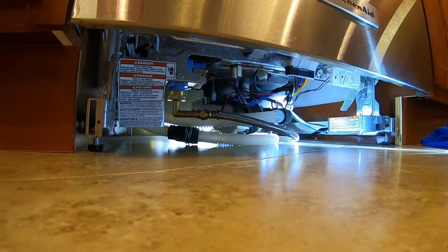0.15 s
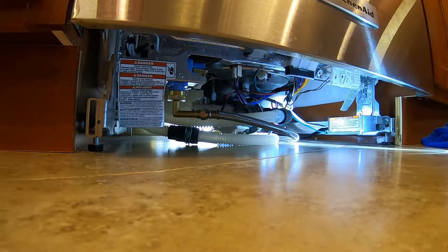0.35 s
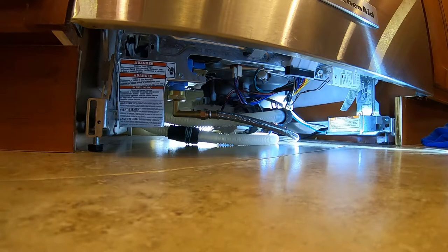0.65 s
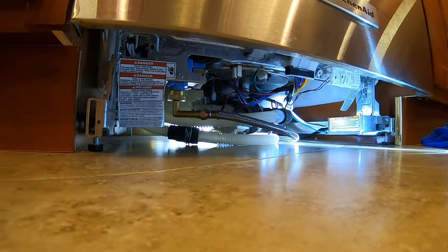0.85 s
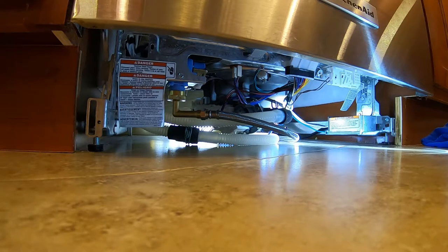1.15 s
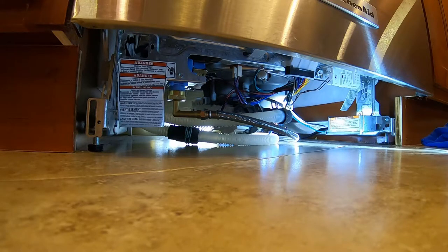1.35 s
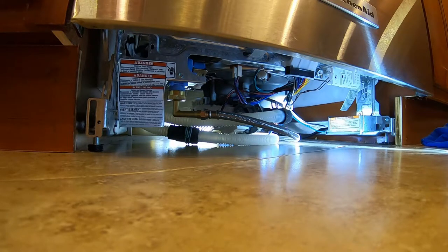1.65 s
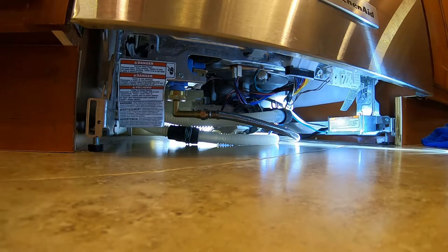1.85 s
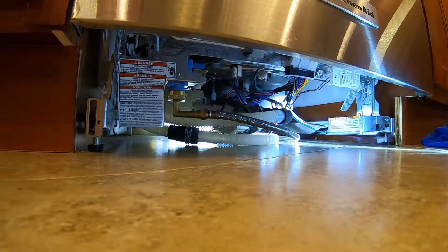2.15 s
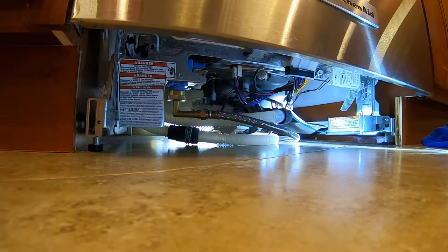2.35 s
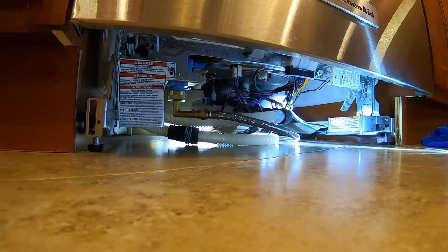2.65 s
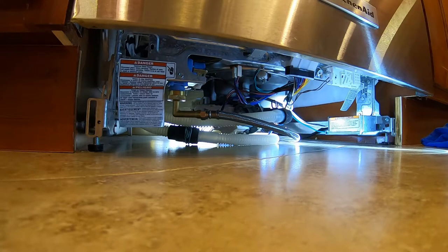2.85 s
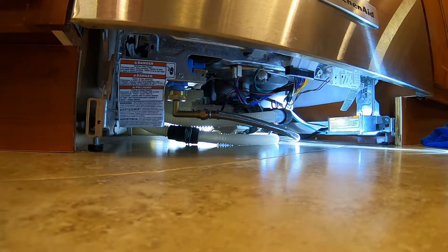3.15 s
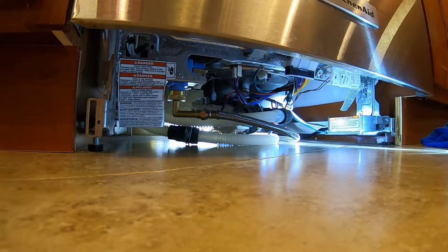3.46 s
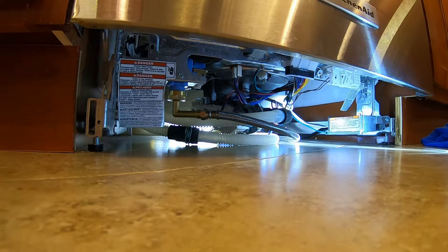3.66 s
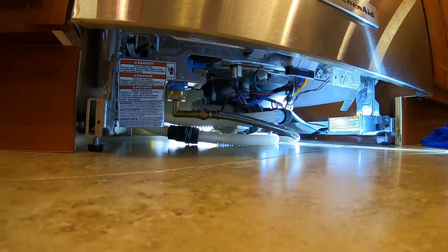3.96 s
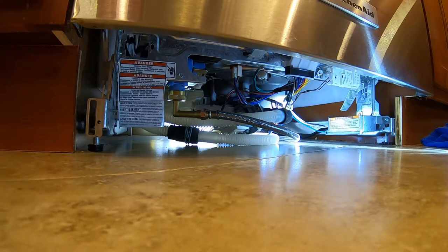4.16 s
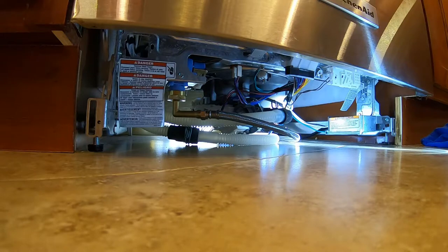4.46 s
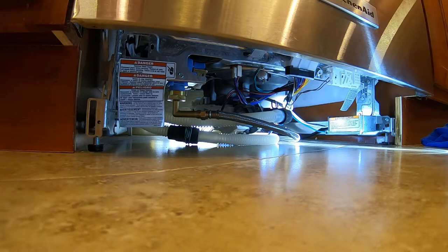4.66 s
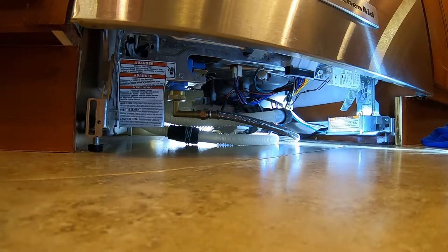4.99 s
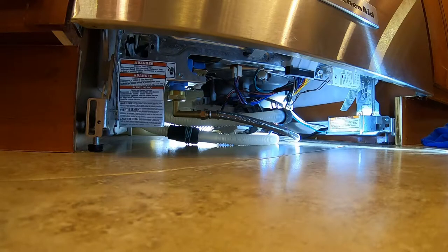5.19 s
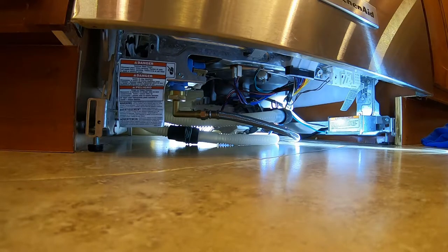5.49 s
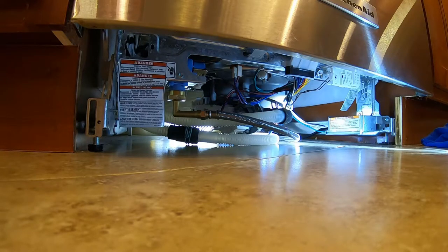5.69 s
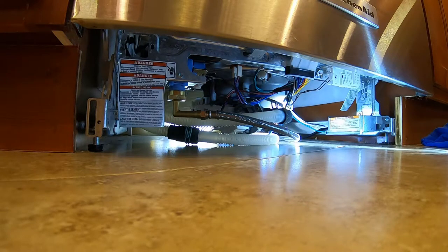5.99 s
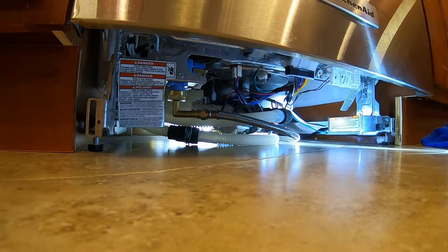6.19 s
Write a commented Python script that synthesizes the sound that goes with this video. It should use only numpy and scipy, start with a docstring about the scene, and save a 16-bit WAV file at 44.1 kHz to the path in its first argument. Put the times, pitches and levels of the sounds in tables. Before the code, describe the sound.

A stereo pair on a kitchen floor, just before a dishwasher's open base, hears steady deep motor hum, grainy buzzing and faint whine above low rumble. Spray washes continuously, with soft burbles and scattered droplets. The sharp water-inlet hiss stops in two quick steps within the first two seconds, ending in a thud; later, wet gulping slurps thicken, ease, then briefly return.

```python
"""A steady low hum with a coarse buzz, water rushing and gurgling, and a hiss that shuts in two steps.
It is a dishwasher pump, heard by a stereo pair on the kitchen floor just in front of the open kick panel.
The motor hums at twice the mains rate, whines on mains overtones, and buzzes and knocks each mains cycle.
Shaped noise makes the low shake and rumble, the rush of water, and its drops, burbles and slurps.
The fill valve is a jet of bright noise, part of it ringing in its pipe; it shuts with a thump."""
import sys
import numpy as np
from scipy import signal
from scipy.fft import rfft, irfft
from scipy.io import wavfile

SR = 44100
rng = np.random.default_rng(int(sys.argv[2]) if len(sys.argv) > 2 else 0)


def wav_out(sig):
    """Save sig, one row per channel (or a flat mono array), as 16-bit PCM at SR to the path in sys.argv[1]."""
    wavfile.write(sys.argv[1], SR, np.round(np.clip(np.atleast_2d(sig).T, -1, 1) * 32767).astype(np.int16))


N = 279132   # length in samples
HUM_HZ = 119.94   # twice the mains rate


def amp(db):
    """Turn decibels into gain."""
    return 10 ** (np.asarray(db) / 20)


def rms_one(x):
    """Scale to rms 1, all channels together."""
    return x / np.sqrt(np.mean(x ** 2) + 1e-20)


def in_time(rows):
    """Read each column of a time curve, one value a sample."""
    start_s, *columns = np.transpose(rows)
    return [np.interp(np.arange(N) / SR, start_s, column) for column in columns]


def at_hz(points, hz):
    """Read a spectrum on a log-frequency axis."""
    pitch_hz, level_db = np.array(points).T
    return np.interp(np.log(hz), np.log(pitch_hz), level_db)


def drift(rate):
    """Slow random wander of rms 1: noise through two equal low-passes at rate (Hz)."""
    every = 40   # samples between computed points
    pole = np.exp(-2 * np.pi * rate * every / SR)
    noise = rng.standard_normal(N // every + 2002)
    slow = signal.lfilter([1], [1, -2 * pole, pole ** 2], noise)[2000:]   # drop the filter's start
    return np.interp(np.arange(N) / every, np.arange(len(slow)), rms_one(slow))


# stereo width on the floor: pitch_hz, side_minus_mid_db
WIDTH = [(60, -54), (100, -82), (210, -53), (330, -17), (500, -15), (800, -6), (1050, -5.5), (1500, -7),
         (2200, -7), (3600, -12), (4500, -7.5), (5100, -3.5), (5800, -4.5), (6500, -2.5), (14000, 0.5)]
# lean of the motor and water across the pair: pitch_hz, left_minus_right_db
LEAN = [(400, 0), (700, 0), (1050, -3), (1550, -1), (2200, -2.8), (3800, -.6), (5200, -2.3), (5900, .5),
        (6600, -3.6), (7800, -3), (9200, 1.8), (11100, -5.5), (12500, -2.7), (14200, 0)]


def stereo(mid, side, lean, direct=0.44):
    """Spread two sources into a left-right pair; returns its spectrum and the bins in Hz.

    The direct share of the width is the same sound reaching the left port first, a quarter cycle ahead of mid."""
    hz = np.maximum(np.arange(N // 2 + 1) * SR / N, 1)
    wide = amp(at_hz(WIDTH, hz))
    direct = np.clip(direct, 0, 1)
    apart = direct * 1j * rfft(mid) + np.sqrt(1 - direct ** 2) * rfft(side)
    left_right = np.array([[1], [-1]])
    pair = (rfft(mid) + wide * apart * left_right) / np.sqrt(1 + wide ** 2)
    return pair * amp(at_hz(lean, hz) / 2 * left_right), hz


def patchy_noise(spectrum, lean, shared_db, own_db, rate):
    """Coloured noise of rms 1 in half-octave bands that swell together and flicker alone."""
    bins, hz = stereo(*rng.standard_normal((2, N)), lean)
    lowest_hz, highest_hz = spectrum[0][0], spectrum[-1][0]
    bins = bins * amp(at_hz(spectrum, hz)) * (hz > lowest_hz)
    half_octaves = 2 * np.log2(hz)
    together = drift(rate)
    out = 0
    for k in range(int(2 * np.log2(lowest_hz)), int(2 * np.log2(highest_hz)) + 2):
        band = np.cos(np.pi / 2 * np.clip(half_octaves - k, -1, 1)) ** 2
        swell_db = shared_db * together + own_db * drift(rate)
        out = out + amp(swell_db) * irfft(bins * band, N)
    return rms_one(out)


def resonate(x, modes):
    """Drive two-pole resonances in parallel, signs alternating; modes are pitch_hz, width_hz, level_db."""
    out = 0
    for k, (hz, width, level_db) in enumerate(modes):
        r = np.exp(-np.pi * width / SR)
        feed = (1 - r * r) / 2 * np.array([1, 0, -1])
        poles = [1, -2 * r * np.cos(2 * np.pi * hz / SR), r * r]
        out = out + (-1) ** k * amp(level_db) * signal.lfilter(feed, poles, x)
    return out


def splashes(rows, t60, modes_of):
    """A snap and a dying burst of noise ring each row's own resonances; rows are start_s, level_db, colour."""
    length = 4096
    t = np.arange(length) / SR
    out = np.zeros((2, N + length))
    for start_s, level_db, *colour in rows:
        burst = amp(-60 * t / max(t60, .003)) * rng.standard_normal((2, length))
        burst[:, 0] = 5.8   # the snap
        start = round(start_s * SR)
        for mode in modes_of(*colour):
            rung = resonate(resonate(burst, [mode]), [mode])   # twice, for steeper skirts
            rung = rung / np.abs(rung).max(axis=1, keepdims=True)
            out[:, start:start + length] += amp(level_db + mode[2]) * rung
    return irfft(stereo(*out[:, :N], LEAN)[0], N)


# motor hum: start_s, level_db (rms)
HUM = [(0, -20.5), (0.9, -21), (1.05, -22.5), (1.2, -21.5), (2.3, -21.3), (2.94, -22.7), (3.1, -22),
       (4.2, -22.5), (4.38, -24), (4.55, -23), (5.39, -25.5), (5.43, -24), (6.33, -23)]


def hum():
    """Magnetic pull at twice the mains rate, nearly a pure tone with a slight wander of phase."""
    turn = 2 * np.pi * HUM_HZ * np.arange(N) / SR + 0.034 * drift(0.34)
    level_db, = in_time(HUM)
    return np.sqrt(2) * amp(level_db) * np.cos(turn + np.pi)


# overtones of the mains in the motor: multiple_of_mains, level_db (rms before swelling)
WHINE = [(16, -68), (18, -65), (25, -66), (27, -70), (29, -68), (30, -68), (47, -69)]


def whine():
    """Thin tones at multiples of the mains rate, steady in pitch, each swelling on its own."""
    t = np.arange(N) / SR
    out = 0
    for multiple, level_db in WHINE:
        tone = np.sin(np.pi * HUM_HZ * multiple * t + rng.uniform(0, 2 * np.pi))
        out = out + amp(level_db + 2.9 * drift(2.8)) * tone
    return np.sqrt(2) * out


# resonances of the motor housing: pitch_hz, width_hz, level_db
HOUSING = [(1044, 25, -8), (1500, 130, -10.5), (1745, 144, -3.5), (2860, 130, -12), (3770, 130, -15.5),
           (4436, 155, -8), (5500, 49, -9.5), (5754, 67, -6), (9630, 230, -22), (10150, 110, -24),
           (10150, 200, -16.5), (10950, 90, -43)]
# buzz strength within one mains cycle: place_cycles, width_cycles, level_db
BUZZ_BEATS = [(.05, 0.057, -3.5), (.33, 0.031, -5), (.75, 0.19, 1.5)]


def buzz():
    """The rotor shakes the housing in uneven bursts, the same pattern every mains cycle."""
    cycle = HUM_HZ / 2 * np.arange(N) / SR + 0.21
    gate = 0.045   # strength between bursts
    for place, width, level_db in BUZZ_BEATS:
        away = (cycle - place + .5) % 1 - .5
        gate = gate + amp(level_db) * np.exp(-.5 * (away / width) ** 2)
    shaking = gate * amp(0.19 * drift(2.7)) * rng.standard_normal((2, N))
    pair, _ = stereo(*resonate(shaking, HOUSING), LEAN)
    return amp(-50.5) * rms_one(irfft(pair, N))


# resonances struck by the rotor: pitch_hz, width_hz, level_db
KNOCK_MODES = [(1090, 86, -10), (1470, 290, 0), (1764, 74, 7), (2930, 280, -13), (4330, 180, -17),
               (5560, 490, -10)]


def knock():
    """The rotor knocks once a mains cycle, a little unevenly in time and strength."""
    cycles = np.arange(int(N / SR * HUM_HZ / 2) - 1)
    late, strength = rng.standard_normal((len(cycles), 2)).T
    start_s = (cycles + .77) * 2 / HUM_HZ + .00006 * late
    clicks = np.zeros((2, N))
    clicks[0, np.clip(start_s * SR, 0, N - 1).astype(int)] = amp(2.7 * strength)
    struck = resonate(clicks + 1e-18, KNOCK_MODES)   # the tiny offset keeps the filters off zero
    pair, _ = stereo(*struck, LEAN, direct=0.57)
    return amp(-54) * rms_one(irfft(pair, N))


# level of the low rumble, and of the low shake, which wavers at random: start_s, rumble_db, shake_db
LOW_LEVELS = [(0, -35, -39), (.7, -38, -41.5), (1.5, -35.5, -41), (2.2, -37, -37.5), (3.1, -36, -41),
              (3.6, -37, -41), (4.4, -38, -39), (5.05, -36, -41), (5.5, -39, -41), (6.33, -37.5, -38)]
# colour of the floor shake: pitch_hz, level_db (per Hz)
FLOOR_SHAKE = [(20, -34), (32, -20), (45, -3.5), (100, -5.5), (125, -7.5), (160, -46)]
THUD_DB, THUD_S = 14, 0.21   # rise of the shake, and time to die away


def floor_shake():
    """Low noise in the floor wavers at random; the last step of the valve jolts the pipes and adds a thud."""
    _, shake_db = in_time(LOW_LEVELS)
    since = np.arange(N) / SR - VALVE_STEPS[-1][0]
    thud_db = np.maximum(THUD_DB * (1 - since / THUD_S), 0) * (since > 0)
    noise = patchy_noise(FLOOR_SHAKE, LEAN, shared_db=-2.8, own_db=0.5, rate=8.4)
    return amp(shake_db + thud_db) * noise


# colour of the sump rumble: pitch_hz, level_db (per Hz)
RUMBLE = [(90, -27), (125, 0), (140, 4.5), (190, -2.5), (250, -7), (360, -8), (430, -10), (540, -14),
          (680, -25), (860, -16), (1200, -44)]


def sump_rumble():
    """Water in the sump: low noise that flickers fast."""
    rumble_db, _ = in_time(LOW_LEVELS)
    return amp(rumble_db) * patchy_noise(RUMBLE, LEAN, shared_db=1.5, own_db=0.8, rate=36)


# colour of the spray, also read by drops: pitch_hz, level_db (per Hz)
SPRAY = [(260, -18), (450, -6.5), (651, -6), (1250, -6), (1730, -5), (1920, -6.5), (2820, -11),
         (3570, -15.5), (4460, -16.5), (5250, -17), (5740, -17), (6950, -24), (10700, -26), (13900, -38),
         (15500, -58)]


def spray():
    """Spray on the tub walls: a broad, flickering rush of noise."""
    return amp(-43) * patchy_noise(SPRAY, LEAN, shared_db=1.2, own_db=1.44, rate=31)


# colour of the valve jet: pitch_hz, level_db (per Hz)
HISS = [(1470, -13), (2500, -6.5), (2850, -3.5), (4010, -17.5), (4640, -8), (5920, -11), (6430, -12.5),
        (7440, -11.5), (8340, -3.5), (9940, -5.5), (10800, -10), (13300, -16), (15500, -26)]
# lean of the hiss across the pair: pitch_hz, left_minus_right_db
HISS_LEAN = [(2200, 1), (3500, 0), (4500, -3), (5300, 2), (6500, -9), (7500, -13), (8300, 10), (8900, -1),
             (9900, 2.5), (11200, -2), (13200, -1), (15000, 4)]
# resonances of the fill pipe: pitch_hz, width_hz, level_db
PIPE = [(4570, 73, -4), (4740, 48, -5), (5020, 49, -4), (5355, 90, -4), (5815, 56, -4), (6270, 80, -1),
        (6700, 80, -5), (7110, 55, -3), (7890, 50, -3), (8020, 50, -1), (8220, 110, 0), (8340, 50, -1),
        (8665, 90, -3), (9040, 52, -4), (9220, 56, -3), (9670, 160, -5), (10210, 72, -5), (10900, 72, -13),
        (11400, 60, -14), (12900, 200, -18)]
# the valve closes in steps, the last also felt in floor_shake: start_s, length_s, drop_db
VALVE_STEPS = [(1.338, 0.054, 8), (1.593, .04, 37)]
VALVE_OPEN_DB, PIPE_DB = -39.5, -4   # open valve, and its pipe ring against that
PIPE_FOLLOWS = .4   # the ring of the pipe sinks by this share more than the jet


def fill_valve():
    """A jet through the valve: smooth bright noise, part of it ringing in the pipe."""
    t = np.arange(N) / SR
    level_db = VALVE_OPEN_DB
    for start_s, length_s, drop_db in VALVE_STEPS:
        level_db = level_db - drop_db * np.clip((t - start_s) / length_s, 0, 1)
    jet = patchy_noise(HISS, HISS_LEAN, shared_db=0.2, own_db=2.0, rate=12.0)
    rung = resonate(rng.standard_normal((2, N)), PIPE)
    pair, _ = stereo(*rung, HISS_LEAN, direct=0.65)
    ring_db = PIPE_DB + PIPE_FOLLOWS * (level_db - VALVE_OPEN_DB)
    return amp(level_db) * (jet * 0.69 + amp(ring_db) * rms_one(irfft(pair, N)))


def droplet(hz):
    """A drop rings briefly in one broad band, with a dry spit around it."""
    return [(hz, 0.17 * hz, 0), (hz, 1.0 * hz, -6)]


# drops on the tub wall at set times: start_s, level_db (peak), pitch_hz
DROPS = [(1.619, -40, 9600), (2.073, -42, 7500), (2.527, -38, 6300), (2.547, -44, 12000),
         (2.62, -44, 10500), (2.935, -41, 6700), (2.968, -41, 7000), (3.525, -47, 12000), (3.7, -44, 8000),
         (3.78, -46, 8500), (4.5, -46, 11500), (5.127, -41, 8100), (5.7, -42, 7000), (5.973, -39, 7000),
         (6.078, -45, 7000), (6.24, -46, 10000)]


def drops():
    """Drops hit the tub wall: some at set times, and a random patter coloured like the spray."""
    when, size, pitch = rng.random((300, 3)).T
    hz = 300 * amp(32 * pitch)
    level_db = -42.5 + 9.4 * size + at_hz(SPRAY, hz) + 10 * np.log10(hz / 1000)
    patter = np.stack([when * (N - 1) / SR, level_db, hz], axis=1)
    return splashes([*DROPS, *patter], 0.02, droplet)


def low_thud(hz):
    """A dull, wide note, as a pocket of air bursts or the valve thumps shut."""
    return [(hz, 0.83 * hz, -2)]


# low thuds: burbles in the sump at set times, and at 1.607 s the thump of the valve shutting:
# start_s, level_db (peak, before the note's own level), pitch_hz
LOW_THUDS = [(0.106, -24.5, 334), (0.479, -27, 316), (0.67, -33, 293), (1.115, -24, 243), (1.268, -27, 431),
             (1.607, -23, 264), (2.185, -24, 355), (2.338, -26, 264), (2.605, -28.5, 277),
             (2.645, -32, 374), (2.981, -29, 245), (3.181, -27, 350), (3.422, -29, 385), (4.027, -26, 245),
             (4.337, -31, 318), (4.505, -37, 274), (4.616, -33, 280), (5.011, -24.5, 242),
             (5.968, -26, 353), (6.074, -28, 367)]
SMALL_BURBLE_DB, SMALL_BURBLE_HZ = (-45, -30.5), (240, 440)   # ranges of the random small ones


def burbles_and_valve_thump():
    """Air pockets burst in the sump, twenty small ones at random; the valve shuts with a like thump."""
    low, high = np.transpose([(0, (N - 1) / SR), SMALL_BURBLE_DB, SMALL_BURBLE_HZ])
    small = low + (high - low) * rng.random((20, 3))
    return splashes([*LOW_THUDS, *small], .04, low_thud)


# air modes of the hose and, last, the broad smack of the water: pitch_hz, width_hz, level_db
HOSE = [(1470, 460, -3.5), (2670, 650, -10), (4040, 1400, -23), (2600, 2700, -4)]


def note_over_hose(hz, ring_db):
    """One note over the modes of the half-filled hose, each mode struck with a strength of its own."""
    modes = [(hz, 0.18 * hz, 0)]
    for mode_hz, width_hz, level_db in HOSE:
        struck_db = ring_db + level_db + 2 * rng.standard_normal()
        modes.append((mode_hz, width_hz, struck_db))
    return modes


# slurps in the drain hose, and a few short buzzes of the motor near 1740 Hz:
# start_s, level_db (peak), pitch_hz, ring_db (against the peak)
SLURPS_AND_BUZZES = [(0.4554, -32, 2260, -1), (1.059, -29, 4930, 0), (1.5794, -31.5, 2120, 1),
                     (1.8043, -36, 1470, -2), (1.956, -31, 3030, -7), (2.0813, -35, 1740, -5),
                     (2.2298, -35, 1210, -9), (2.381, -35, 4300, -8), (2.4723, -30.5, 5050, -5),
                     (2.847, -38, 1730, -9), (2.9734, -32, 1370, 0), (3.2625, -34, 1740, -3),
                     (3.4596, -32, 1710, -11), (3.5445, -35.5, 1530, -10), (3.7389, -33.5, 3800, -7),
                     (3.9654, -32.5, 4270, -1), (4.0352, -31, 1370, -4), (4.097, -36, 1500, -4),
                     (4.27, -37, 2980, 0), (4.296, -37, 1410, 0), (4.3644, -36.5, 1640, 0),
                     (4.3952, -30, 1470, -1), (4.4148, -33.5, 2780, 6.5), (4.453, -38, 3920, 1),
                     (4.4687, -31, 1300, 0), (4.5, -33, 2100, 1), (4.5192, -35.5, 2430, 1.5),
                     (4.6894, -37, 2730, -7), (4.7127, -34, 1360, -6), (4.7373, -30, 2860, -1),
                     (4.7553, -28.5, 1300, 1), (4.763, -30, 1960, 2), (4.784, -33, 2320, 3),
                     (4.7976, -28.5, 1270, -3), (4.8192, -24.5, 1410, -9), (4.831, -38.5, 2760, 8),
                     (4.8515, -27.5, 2330, 3), (4.8614, -29, 1290, 0), (4.8744, -29, 3860, 2),
                     (4.929, -31.5, 1420, -8), (4.9483, -28, 1370, -4), (4.9586, -28, 2580, 0.5),
                     (4.9724, -39, 4050, 10), (5.0067, -37.5, 3100, 4), (5.0494, -40, 3740, 7),
                     (5.1025, -34.5, 3500, 3), (5.1269, -31.5, 2390, 4), (5.5285, -35, 1730, -2),
                     (5.6974, -31, 3900, -6), (5.9807, -37, 2410, -3), (6.022, -34, 1360, 3),
                     (6.077, -34.5, 1780, 3), (6.0947, -29, 1370, -2), (6.131, -30, 2130, -0.5),
                     (6.1512, -25.5, 3000, 0.5), (6.164, -38, 3040, -3), (6.2878, -33.5, 3670, -8)]


def slurps_and_short_buzzes():
    """Air pockets slurp and ring the drain hose; short motor buzzes are made by the same bursts."""
    return splashes(SLURPS_AND_BUZZES, .031, note_over_hose)


def scene():
    """All sources under the machine, the hum a touch stronger on the right."""
    motor = hum() * amp([[-.05], [.05]]) + whine() + buzz() + knock()
    low_noise = floor_shake() + sump_rumble()
    splashing = spray() + drops() + burbles_and_valve_thump() + slurps_and_short_buzzes()
    return motor + low_noise + splashing + fill_valve()


def record(dry):
    """The microphone pair's top is cut at 15.7 kHz; the filter starts settled on the first sample."""
    cut = signal.ellip(10, .5, 50, 15700, fs=SR, output="sos")   # order, ripple dB, stop dB, Hz
    settled = signal.sosfilt_zi(cut)[:, None] * dry[None, :, :1]
    return signal.sosfilt(cut, dry, zi=settled)[0]


dry = scene()
out = record(dry)
wav_out(out)
```